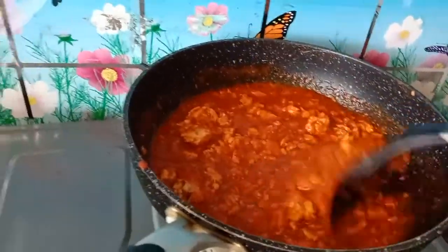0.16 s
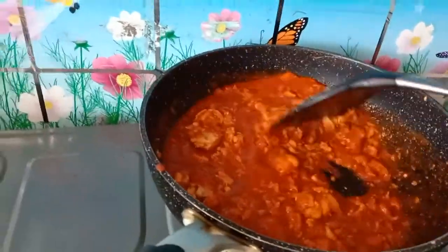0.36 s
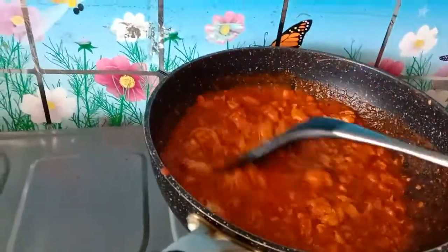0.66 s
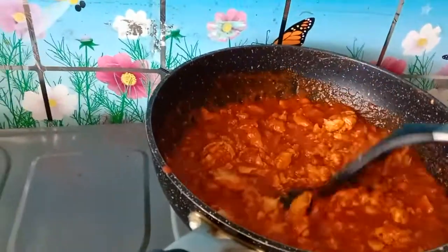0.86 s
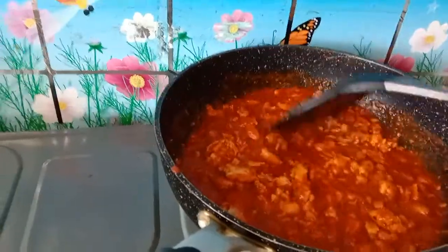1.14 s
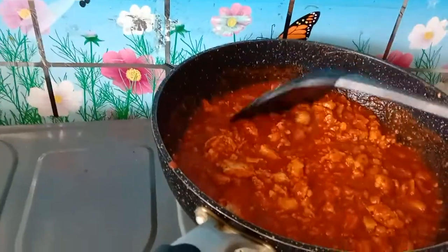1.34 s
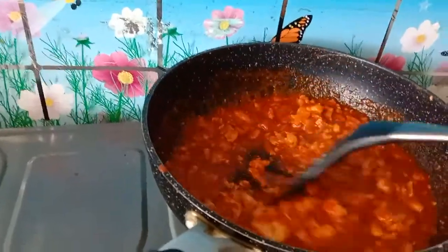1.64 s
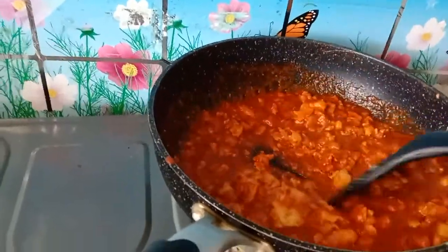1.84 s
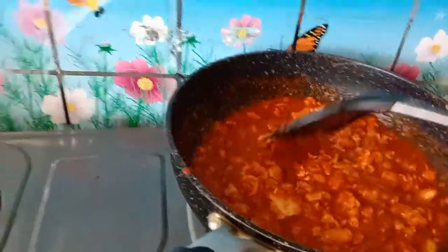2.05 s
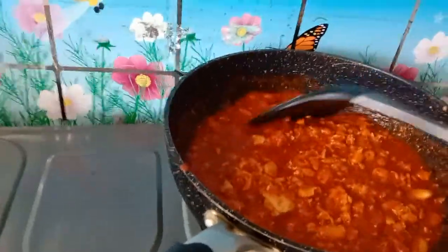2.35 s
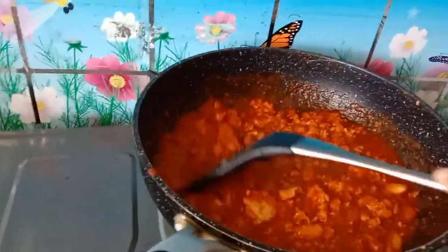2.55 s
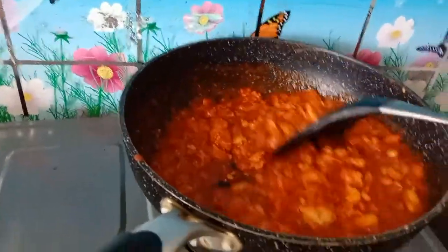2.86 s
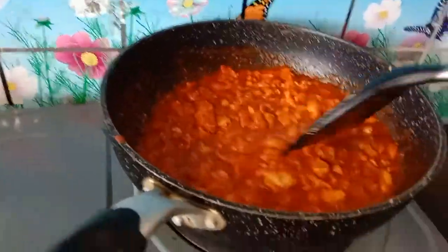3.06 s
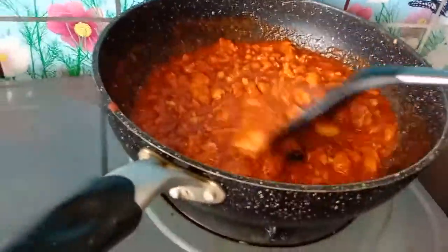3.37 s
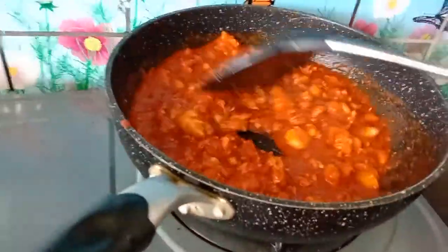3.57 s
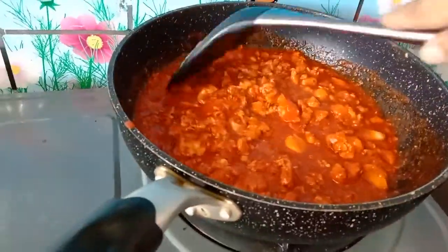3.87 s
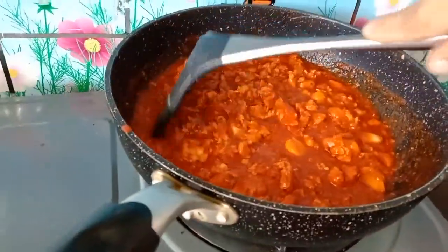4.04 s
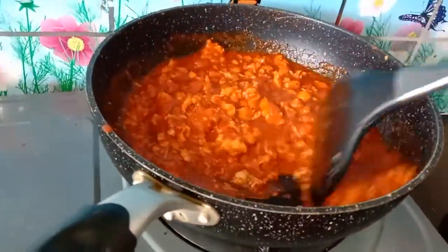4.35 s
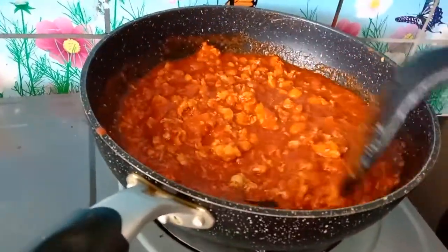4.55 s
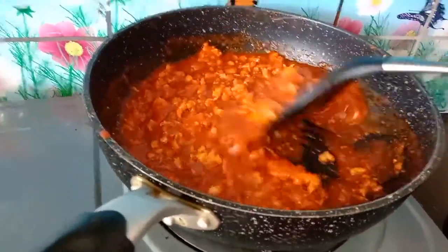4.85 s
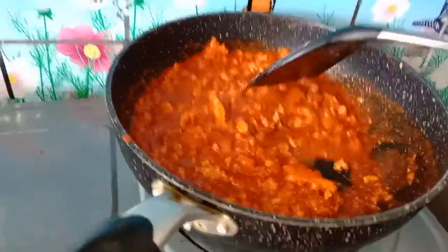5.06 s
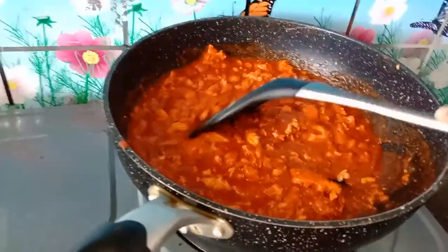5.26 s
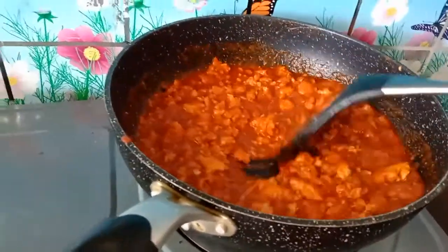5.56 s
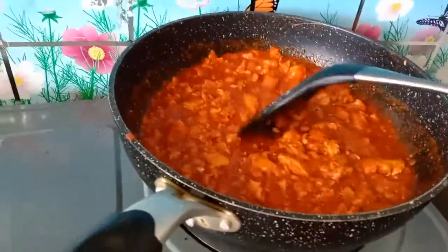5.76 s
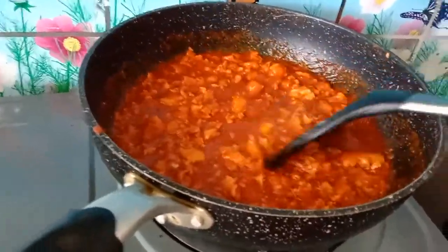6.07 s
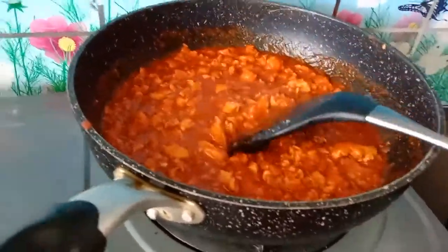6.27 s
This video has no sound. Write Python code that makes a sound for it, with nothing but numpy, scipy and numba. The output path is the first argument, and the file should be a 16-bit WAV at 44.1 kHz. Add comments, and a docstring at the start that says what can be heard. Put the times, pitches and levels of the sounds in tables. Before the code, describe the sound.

A soft spatula stirs thick, wet sauce in uneven strokes: low rubbing stutter, hollow gritty drag, squelch and light rasp. Steam crackles and fizzes in short bursts, bubbles snap, blip and gulp, and a fine hiss runs throughout. The densest spitting is early and after four seconds, with one loud pop before three. The close, slightly reverberant kitchen sound ends with a spatula knock on the pan.

```python
"""Stirring thick sauce

One microphone close above the stove in a small tiled kitchen: sauce simmers in a frying pan as a plastic
spatula stirs it. The blade's stick-slip judders, grit sounds the pan, and the parted sauce squelches.
Random steam bursts sizzle and crackle; snapping skin pops, ringing air pockets blip and gulp. The edge taps
the pan floor, and at last the spatula knocks the pan. Filtered room noise and a faint hum lie underneath.
"""
import sys
import numpy as np
from scipy import signal
from scipy.fft import rfft, irfft, next_fast_len
from scipy.io import wavfile
from scipy.ndimage import uniform_filter1d
from numba import njit

SR = 44100
rng = np.random.default_rng(int(sys.argv[2]) if len(sys.argv) > 2 else 0)


def pcm_store(signal):
    """Save signal as 16-bit PCM."""
    levels = np.round(np.clip(np.atleast_2d(signal), -1, 1) * 32767)
    wavfile.write(sys.argv[1], SR, levels.astype(np.int16).T)


N = 282681
TIME = np.arange(N) / SR

# sauce turned over by the blade:
# (time [s], length [s], relative sputter level [dB], relative wet crackle level [dB])
TURNS = [(.08, 0.19, -51, -40.5), (.265, 0.17, -47, -43), (.39, 0.11, -44, -48), (.6, .06, -49, -56),
         (.72, 0.052, -49.5, -81), (.96, 0.14, -50.5, -45), (1.08, 0.014, -30.5, -30.5),
         (1.26, 0.025, -40.5, -37.5), (1.325, 0.029, -48, -80), (1.95, 0.091, -54, -45.5),
         (2.14, 0.038, -43.5, -64), (2.24, 0.17, -63, -44), (2.645, 0.045, -41.5, -25.5),
         (2.793, 0.025, -39.5, -36.5), (2.89, 0.13, -54, -52), (3.07, 0.11, -57.5, -59),
         (3.22, 0.011, -70, -42.5), (3.73, 0.077, -44, -56), (4.23, 0.16, -53, -45),
         (4.36, 0.16, -53.5, -39), (4.58, 0.13, -64, -42), (4.835, 0.035, -38.5, -44),
         (4.88, 0.047, -43, -35), (4.95, 0.11, -45, -42), (5.165, 0.059, -47.5, -41),
         (5.29, 0.23, -59, -44), (5.475, 0.04, -42, -39.5), (5.69, 0.033, -49.5, -63),
         (5.81, 0.094, -57, -47), (6.08, 0.028, -51, -65), (6.19, 0.05, -56, -42)]


def undb(db):
    """Decibels to gain."""
    return 10 ** (np.asarray(db) / 20)


def unit(x):
    """Scale to a standard deviation of 1."""
    return x / np.std(x)


def add(out, s, x):
    """Mix x into out from time s, in seconds."""
    i = max(int(s * SR), 0)
    out[i:i + len(x)] += x[:max(len(out) - i, 0)]


def peak(x, db):
    """Set the loudest 2 ms of a sound to an rms level."""
    loudest_power = uniform_filter1d(x * x, size=88).max()
    return x * undb(db) / np.sqrt(loudest_power)


def fade(t, t60):
    """Exponential decay, 60 dB down after t60 seconds."""
    return np.exp(-np.log(1000) * t / max(t60, 1e-4))


def colour(x, points):
    """Filter by a spectrum of (frequency [Hz], level [dB]) points, joined along log frequency."""
    hz, db = np.transpose(points)
    n = next_fast_len(len(x))
    f = np.fft.rfftfreq(n, 1 / SR) + 1  # + 1 keeps the logarithm finite
    gain = undb(np.interp(np.log(f), np.log(hz), db))
    return irfft(rfft(x, n) * gain, n)[:len(x)]


def band(x, hz, width_hz):
    """One resonance, gain 1 at its centre; centre and width are capped for stability."""
    q = hz / min(abs(width_hz), SR / 4)
    return signal.lfilter(*signal.iirpeak(min(hz, SR / 3), q, fs=SR), x)


@njit
def moving_band(x, hz, damping):
    """State-variable resonance whose centre moves."""
    y, b, low = np.empty(len(x)), 0., 0.
    for i in range(len(x)):
        g = np.tan(np.pi * hz[i] / SR)
        y[i] = (b + g * (x[i] - low)) / (1 + g * (g + damping))
        b, low = 2 * y[i] - b, low + 2 * g * y[i]
    return y


def ring(x, modes):
    """A set of resonances driven together."""
    return sum(undb(db) * band(x, hz, width) for hz, width, db in modes)


def walk(rate):
    """Random wander with spread 1, in straight lines between rate knots a second."""
    knots = rng.standard_normal(int(N / SR * rate) + 2)
    return unit(np.interp(TIME * rate, np.arange(len(knots)), knots))


def tone(hz, waver, rate):
    """A note of rms 1 whose pitch wavers at random."""
    pitch = hz * (1 + waver * walk(rate))
    return unit(np.sin(2 * np.pi * np.cumsum(pitch) / SR))


def clicks(rate, spread_db):
    """Random impulses, rate a second on average, most small and a few large."""
    size = undb(spread_db * np.minimum(rng.exponential(size=N), 4))
    happens = rng.random(N) < rate / SR
    return happens * size * np.sign(rng.standard_normal(N))


def bubble(hz, t60, glide, swell):
    """A pocket of air rings; its pitch rises as it opens to the surface."""
    t = np.arange(int(SR * abs(t60)) + 64) / SR
    pitch = hz * (1 + glide * (t / t[-1] - 1 / 4))
    opening = (1 - np.exp(-t / (swell * t[-1]))) ** 2
    return np.sin(2 * np.pi * np.cumsum(pitch) / SR) * fade(t, t60) * opening


def froth(count, low_hz, high_hz, cycles, spread_db):
    """Many small air pockets open at random, each ringing until it has died away."""
    out = np.zeros(N)
    for when, pitch, size, damping in rng.random((count, 4)):
        hz = low_hz * (high_hz / low_hz) ** pitch
        gain = undb(-spread_db * np.log(max(size, .05)))
        t60 = cycles * (.5 + damping) / hz
        add(out, when * N / SR, gain * bubble(hz, t60, glide=0.076, swell=0.032))
    return unit(out)


def spits(count, low_hz, high_hz, t60, spread_db):
    """Small craters spit at random, each a brief puff with a pitch of its own."""
    out, t = np.zeros(N), np.arange(SR // 25) / SR
    for when, pitch, size, length in rng.random((count, 4)):
        hz = low_hz * (high_hz / low_hz) ** pitch
        gain = undb(-spread_db * np.log(max(size, .08)))
        puff = rng.standard_normal(len(t)) * fade(t, t60 * (.5 + length))
        puff = band(band(puff, hz, hz / 12), hz, hz / 12)
        add(out, when * N / SR, gain * puff)
    return unit(out)


def strokes(rows, attack_s, release_s, rest_db, wander_db, lumps_db, axis=2):
    """Gain of a layer: strokes rise, catch on lumps and die away; light stirring wanders in between."""
    gain = np.zeros(N)
    for row, rise_s in zip(rows, np.broadcast_to(attack_s, len(rows))):
        s, length_s, db = row[0], row[1], row[axis]
        t = np.arange(int(SR * (abs(length_s) + abs(release_s)))) / SR
        rise = np.clip(t / rise_s, 0, 1)
        add(gain, s, undb(db) * rise * fade(np.maximum(t - length_s, 0), release_s))
    lumps = undb(lumps_db * np.clip(walk(45), -1.5, 1.5))
    light_stirring = undb(rest_db + wander_db * np.tanh(walk(8.7)))
    return np.hypot(gain * lumps, light_stirring)


def stroke_pitch(rows, octaves_per_s):
    """Each stroke glides up through its own pitch at a common rate."""
    times, pitches = [], []
    for s, length_s, _, hz in rows:
        times += [s, s + length_s]
        pitches += [hz * 2 ** (side * octaves_per_s * length_s / 2) for side in (-1, 1)]
    return np.interp(TIME, np.maximum.accumulate(times), pitches)


def in_pan(x, early_db=1, late_db=-4, early_t60=0.11, late_t60=0.16):
    """A sound leaves one spot of the pan: resonances, quick echoes off rim and tiles, the kitchen's tail."""
    # upper resonances of the pan: (frequency [Hz], width [Hz], nominal level [dB])
    pan_modes = [(1400, 180, -16), (1620, 170, -2), (1970, 71, -2.5), (2296, 28, 0.5), (2637, 49, 2),
                 (3324, 116, -0.5), (3335, 46, -40), (3765, 28, 5), (4930, 85, 2), (5360, 205, 3),
                 (6490, 175, -3), (7000, 40, -11)]
    t = np.arange(SR // 3) / SR
    echo = np.zeros(len(t))
    for db, t60 in (early_db, early_t60), (late_db, late_t60):
        tail = rng.standard_normal(len(t)) * fade(t, t60) * (t > .001)
        echo += undb(db) * tail / np.linalg.norm(tail)
    echo[0] = 1  # the direct sound
    # every spot shifts the resonances a little in pitch and level
    shifts = rng.standard_normal((len(pan_modes), 2))
    spot = [(hz * (1 + .015 * shift), width, db + 2 * gain)
            for (hz, width, db), (shift, gain) in zip(pan_modes, shifts)]
    return signal.fftconvolve(x + ring(x, spot), echo / np.linalg.norm(echo))[:len(x)]


def around_pan(x, early_db, late_db, count=3):
    """A lasting sound shifts between several spots in the pan, so its colour keeps changing."""
    shares = np.array([walk(14) for _ in range(count)])
    shares /= np.linalg.norm(shares, axis=0)
    return sum(in_pan(x * share, early_db, late_db) for share in shares)


def spatula():
    """The soft blade sticks and slips in a low judder; its drag sounds the pan's hollow and gurgles."""
    # blade pressed on the pan: (time [s], length [s], relative level [dB], judder pitch [Hz])
    rubs = [(0.0, 0.068, -45.5, 103.7), (.1, 0.062, -37.5, 106.2), (.2, 0.065, -39, 104.8),
            (.32, 0.013, -48, 107), (.42, 0.033, -44, 101), (.55, 0.027, -50, 99.2),
            (.66, 0.12, -60, 102.4), (2.0, 0.079, -51, 110), (2.06, 0.035, -42, 103.6),
            (2.115, 0.063, -47, 108), (2.17, 0.18, -51.5, 101.1), (2.37, 0.036, -44, 102.4),
            (2.42, 0.067, -38.5, 103.8), (2.54, 0.17, -42.5, 101.3), (2.72, 0.06, -40, 101.2),
            (2.87, 0.19, -49.5, 104.6), (2.97, 0.15, -47, 105.4), (3.2, 0.026, -41.5, 106.2),
            (3.3, 0.31, -48.5, 109.5), (3.69, 0.11, -58.5, 111), (3.89, .14, -46, 110.7),
            (4.485, 0.23, -48, 122.5), (4.7, 0.059, -48, 127.3), (5.42, 0.13, -58, 135.4),
            (5.9, 0.093, -54, 140), (5.97, 0.21, -46.5, 139), (6.165, .17, -44, 137.3),
            (6.34, 0.02, -33, 132)]
    # blade dragged through the sauce: (time [s], length [s], relative level [dB])
    drags = [(.08, 0.15, -55.5), (.29, 0.038, -47), (.41, 0.076, -40), (.55, 0.072, -51.5),
             (.64, 0.05, -47), (.88, 0.028, -50.5), (.97, 0.022, -55), (1.07, 0.25, -56),
             (1.82, 0.11, -51.5), (2.05, 0.076, -46.5), (2.21, .14, -47.5), (2.48, 0.093, -53),
             (3.04, 0.094, -47.5), (3.19, 0.18, -50.5), (3.46, 0.26, -52.5), (3.765, 0.075, -41.5),
             (3.86, 0.049, -59), (3.985, 0.034, -49), (4.475, 0.031, -43.5), (4.59, 0.146, -46),
             (4.86, 0.24, -52.5), (5.26, 0.077, -56.5), (5.47, 0.068, -53), (5.6, .06, -60),
             (5.79, 0.099, -56), (5.87, 0.044, -44), (6.145, 0.039, -40), (6.22, 0.044, -44.5),
             (6.34, 0.03, -49.5)]
    # resonances of the pan's hollow: (frequency [Hz], width [Hz], relative level [dB])
    hollow_modes = [(579, 16, 7.5), (590, 18, -14), (657, 48, -4.5)]
    # spectrum of the gritty drag: (frequency [Hz], relative level [dB])
    drag_colour = [(100, 10), (250, -2), (450, 18), (750, 19), (1200, -9), (2500, -70)]
    hollow_hz = 580
    stove_hz, stove_db, stove_db_per_hz = 174.8, 8, 0.67  # the stove top's note

    pitch = stroke_pitch(rubs, octaves_per_s=0.12)
    slips = tone(pitch, waver=.035, rate=70) * undb(1.2 * walk(45))
    rough = moving_band(rng.standard_normal(N), 1.05 * pitch, 0.7)
    slips += undb(-8) * unit(moving_band(rough, 1.05 * pitch, 0.7))
    # uneven slips thump nearly an octave higher
    thump = moving_band(rng.standard_normal(N), 1.9 * pitch, 0.39)
    slips += undb(-22.5) * unit(moving_band(thump, 1.9 * pitch, 0.39))
    # the stove top's share falls as the judder's pitch moves away from its note
    stove_share = undb(stove_db - stove_db_per_hz * np.abs(stove_hz - pitch))
    stove = tone(stove_hz, waver=0.0289, rate=55) * stove_share
    pressure = strokes(rubs, attack_s=.025, release_s=.14, rest_db=-76, wander_db=4, lumps_db=1.3)
    judder = unit(slips + stove) * pressure

    grit = clicks(rate=2800, spread_db=2.0)
    gritty_hollow = unit(band(ring(grit, hollow_modes), 619, 140))
    hollow_note = tone(hollow_hz, waver=.035, rate=70) * undb(2.5 * walk(35))
    hollow = unit(gritty_hollow + hollow_note)
    hollow += undb(-10.5) * unit(colour(grit, drag_colour))
    gurgle = froth(count=380, low_hz=400, high_hz=850, cycles=35, spread_db=1.8)
    dragging = strokes(drags, attack_s=0.014, release_s=0.15, rest_db=-65.0, wander_db=3.5, lumps_db=0.5)
    return judder + (undb(-2.0) * hollow + undb(-15.5) * gurgle) * dragging


def squelch():
    """Wet grit and froth sound the gap behind the blade; its pitch rises as it opens."""
    # blade parting the sauce: (time [s], length [s], relative level [dB], pitch of the gap [Hz])
    partings = [(.06, 0.049, -49, 1530), (.22, 0.16, -49, 1520), (.37, 0.26, -55, 1220),
                (.58, 0.04, -57, 2100), (1.07, 0.024, -43, 1670), (1.19, 0.067, -45, 1270),
                (1.36, 0.021, -57, 1530), (1.63, 0.038, -55, 1160), (1.7, 0.049, -49, 1910),
                (1.94, 0.038, -42, 1270), (1.985, 0.11, -47.5, 1570), (2.33, 0.31, -61, 1730),
                (3.08, .08, -59, 1664), (3.72, 0.069, -51, 1430), (4.23, 0.17, -52, 1490),
                (4.49, 0.25, -58, 1454), (4.865, 0.065, -40, 1380), (5.0, 0.044, -52, 1360),
                (5.47, 0.062, -50.5, 1338), (5.85, 0.045, -42, 1800), (6.01, 0.06, -52, 1440),
                (6.16, 0.084, -47.5, 920)]
    wet = unit(clicks(rate=900, spread_db=3.5))
    gap_hz = stroke_pitch(partings, octaves_per_s=1.1) * undb(.5 * walk(30))
    gap = unit(moving_band(wet, gap_hz, 0.14))
    gap = unit(colour(gap, [(400, -16), (800, -11.0), (1200, 10.5), (2000, 9.0), (4000, -17), (10000, -18)]))
    pockets = froth(count=1000, low_hz=821, high_hz=2100, cycles=75, spread_db=2.4)
    parting = strokes(partings, attack_s=0.0086, release_s=0.029, rest_db=-71.5, wander_db=11.5, lumps_db=1.5)
    wet_gap = undb(-10.5) * gap + undb(-11.5) * pockets
    return around_pan(wet_gap * parting, early_db=3.5, late_db=-2.5)


def scraping(catches_per_s=100):
    """The edge catches and lets go at uneven intervals; each slip is a short rasp of grit in the pan wall."""
    # blade edge on the coated pan floor: (time [s], length [s], level [dB])
    scrapes = [(.09, 0.18, -57), (.25, 0.16, -45), (.39, 0.066, -51), (.6, 0.11, -54.5), (.72, 0.058, -78),
               (.96, 0.13, -58), (1.07, 0.076, -51), (1.27, 0.13, -58.5), (1.95, 0.07, -58),
               (2.15, 0.02, -51), (2.24, 0.22, -61.5), (2.79, 0.13, -60), (3.74, 0.094, -75),
               (4.235, 0.034, -47), (4.29, 0.12, -52), (4.875, 0.069, -45), (4.98, 0.082, -56),
               (5.48, 0.096, -60), (5.68, 0.21, -62.5), (6.2, 0.053, -66)]
    t = np.arange(SR // 20) / SR
    catches = np.abs(clicks(rate=catches_per_s, spread_db=0.5))
    slips = signal.fftconvolve(catches, fade(t, 0.033))[:N]
    grit = clicks(rate=4000, spread_db=1.5) * (.5 + slips)
    rasp = colour(around_pan(grit, early_db=-1.5, late_db=-8.5),
                  [(500, -7), (1000, -21.0), (1600, 4.0), (2300, -12.5), (3400, 4),
                   (4500, 2.0), (6000, 2.0), (9000, -0.5), (16000, -9)])
    contact = strokes(scrapes, attack_s=0.028, release_s=0.051, rest_db=-75.5, wander_db=2.5, lumps_db=1.0)
    return unit(rasp) * contact


def frying():
    """Steam bursts in gritty spurts: sputter and crackle where sauce is turned, sizzle on bare metal."""
    # sauce running onto bared hot metal: (time [s], length [s], relative level [dB], rise [s])
    sizzles = [(0.08, 0.013, -49.5, 0.0042), (0.165, 0.05, -58, .006), (0.21, 0.072, -39.5, 0.057),
               (0.273, 0.12, -49.5, 0.017), (0.588, 0.029, -42, 0.0048), (0.704, 0.042, -51, 0.032),
               (0.905, 0.21, -46, 0.14), (1.268, 0.043, -55, 0.0044), (1.955, 0.079, -62, 0.022),
               (2.13, 0.012, -64, .004), (2.238, 0.028, -48.5, 0.013), (2.647, 0.029, -40.5, 0.0056),
               (2.751, 0.094, -51.5, 0.017), (2.965, 0.22, -59, 0.017), (3.459, 0.045, -51.5, 0.013),
               (3.597, 0.0096, -53, 0.0062), (4.247, 0.046, -53.5, .014), (4.37, 0.12, -48.5, .006),
               (4.583, 0.025, -42, .01), (4.837, 0.12, -43, 0.062), (5.003, 0.014, -39, 0.0053),
               (5.43, 0.027, -43.5, 0.006), (5.714, 0.097, -52, 0.084), (5.985, 0.083, -48, .006),
               (6.246, 0.067, -54.5, 0.012)]
    # spectra of the three sounds: (frequency [Hz], relative level [dB])
    sputter_colour = [(1400, 6), (2200, -42), (3200, 5), (4000, 1), (4800, -47), (6500, -0.5)]
    crackle_colour = [(2500, -32), (4000, -14), (5200, 11), (6800, 4), (8500, -45), (11000, -23),
                      (16000, -52)]
    sizzle_colour = [(1000, -1.5), (2500, -21), (5000, -2), (8000, 8), (11000, 0.5), (16000, 6)]

    coarse = unit(clicks(rate=550, spread_db=3.8))
    sharp = unit(clicks(rate=650, spread_db=4.8))
    spitting = spits(count=800, low_hz=4600, high_hz=8000, t60=.03, spread_db=3.4)
    spray = spits(count=600, low_hz=7000, high_hz=14500, t60=.014, spread_db=4.6)
    sputter = undb(-3) * unit(colour(coarse, sputter_colour))
    sputter += froth(count=1300, low_hz=2224, high_hz=4400, cycles=90, spread_db=2.2)
    crackle = undb(-1.5) * unit(colour(coarse, crackle_colour)) + undb(-1.0) * spitting
    sputter *= strokes(TURNS, attack_s=0.016, release_s=0.19, rest_db=-63.0, wander_db=5.5, lumps_db=0.0)
    crackle *= strokes(TURNS, attack_s=0.0027, release_s=0.17, rest_db=-63.5, wander_db=5.0, lumps_db=0.5,
                       axis=3)

    spurts = undb(4 * np.tanh(walk(140)))
    sizzle = around_pan(sharp + .5 * spray, early_db=3.0, late_db=-3)
    sizzle = unit(colour(sizzle, sizzle_colour) * spurts)
    rises_s = [rise_s for *_, rise_s in sizzles]
    sizzle *= strokes(sizzles, attack_s=rises_s, release_s=0.23, rest_db=-72.5, wander_db=3, lumps_db=0.0)
    turned = around_pan(undb(-14.0) * (sputter + crackle), early_db=4.5, late_db=-8.5)
    return turned + undb(-1.0) * sizzle


def pops():
    """A skin of sauce snaps: a tick and a short spatter ring the little crater and throw fine spray."""
    # bursting sauce: (time [s], relative peak level [dB], centre [Hz], relative width [Hz],
    # relative spatter time [s], relative spray level [dB])
    bursts = [(0.0588, -36, 1700, 500, 0.01, -18), (0.1777, -31, 6900, 2200, 0.013, -11),
              (.238, -35, 6600, 2000, .012, -14), (0.285, -38, 9000, 6000, .004, -7),
              (.336, -36.5, 3970, 1500, 0.015, -17), (0.411, -24.5, 6060, 2210, 0.02, -28),
              (0.448, -31, 3360, 895, 0.022, -33), (0.589, -34.5, 9200, 6050, 0.008, -1),
              (.61, -39, 8500, 6000, .005, -2), (.6104, -42, 2270, 900, 0.012, -19),
              (0.64, -33, 8660, 4000, .007, -13), (.672, -46.5, 3530, 2000, .008, -12),
              (0.905, -36, 8900, 2260, 0.014, -39), (1.062, -33.5, 8200, 3000, .008, -16),
              (1.087, -37, 4730, 3000, 0.018, -28), (1.102, -24.5, 4070, 3000, 0.0072, -28),
              (1.268, -26.5, 7180, 2600, 0.0072, -29), (1.27, -47, 2400, 1400, .02, -25),
              (1.465, -48, 2920, 2500, 0.025, 2), (1.5388, -30.5, 6280, 2100, 0.031, -10.5),
              (1.712, -41.5, 2420, 1180, 0.029, -23), (1.867, -35, 7700, 2190, 0.023, -12.5),
              (2.044, -41, 9400, 3000, 0.0044, -15), (2.058, -36, 8700, 3000, 0.0051, -15),
              (2.131, -35, 5900, 3760, 0.02, -1), (2.157, -34, 3880, 1190, 0.03, -35),
              (2.233, -39, 8600, 4000, 0.005, -20), (2.249, -37.5, 8050, 4000, 0.021, -31),
              (2.268, -33.5, 5800, 3450, 0.03, -26), (2.35, -41, 4760, 1996, 0.025, -30),
              (2.4211, -30, 8600, 3040, 0.0095, -30), (2.48, -30, 3180, 1200, 0.013, -40),
              (2.6517, -17.5, 6130, 1630, 0.0083, -16.5), (2.672, -32, 5270, 1200, 0.019, -33),
              (2.704, -39, 5605, 1500, .018, -26), (2.799, -33, 5650, 1160, .03, -28),
              (2.922, -39, 4024, 600, 0.017, -29), (2.974, -39, 1980, 2500, 0.0066, -3),
              (3.014, -39.5, 9680, 4000, 0.01, -13), (3.05, -34, 11800, 3530, 0.0066, -26),
              (3.141, -38, 9300, 4020, 0.0044, -16), (3.16, -34.5, 9600, 3220, 0.011, -29),
              (3.284, -39.5, 6040, 1437, 0.043, -30), (3.395, -37.5, 7660, 2210, 0.041, -22),
              (3.604, -45, 12400, 1504, 0.015, -12), (3.812, -37, 7500, 2950, 0.014, -24),
              (3.936, -36.5, 7400, 1785, 0.011, -30), (4.134, -39.5, 6350, 1200, 0.043, -24),
              (4.174, -41, 6580, 1200, .007, -30), (4.24, -34, 7250, 1300, 0.025, -13),
              (4.255, -37, 12400, 5000, 0.0082, -8), (4.298, -40.5, 3010, 2600, 0.0097, -18),
              (4.341, -33, 3300, 3500, 0.0074, -16), (4.366, -37.5, 2100, 1600, .014, -20),
              (4.378, -31, 5500, 1810, 0.034, -16), (4.396, -26.5, 6000, 2500, 0.012, -22),
              (4.478, -34, 4750, 2210, 0.047, -10), (4.589, -33.5, 6600, 2860, 0.034, -43),
              (4.629, -32, 6270, 1595, 0.025, -23), (4.668, -36, 8000, 2490, .007, -15),
              (4.71, -39, 6060, 1300, 0.016, -17), (4.756, -38.5, 6580, 2000, .012, -13),
              (4.83, -31.5, 8250, 3960, 0.011, -1), (4.872, -40, 1700, 1200, 0.0068, -20),
              (4.896, -35.5, 3270, 980, 0.022, -23), (4.9144, -31, 5500, 4000, .006, 3),
              (4.949, -36, 9000, 5000, 0.005, -6), (4.975, -35, 9500, 5000, 0.0045, -8),
              (4.934, -40, 3200, 907, 0.012, -28), (4.988, -32.5, 4500, 1000, 0.05, -37),
              (5.009, -28, 6650, 3820, 0.028, -22), (5.164, -32, 6400, 1580, 0.038, -43),
              (5.189, -36, 4460, 980, 0.033, -18), (5.405, -33.5, 7760, 2190, 0.017, -27),
              (5.4313, -30, 10780, 5030, 0.0046, -16), (5.483, -25, 5180, 1700, 0.027, -29),
              (6.139, -28.5, 6040, 1280, 0.039, -29), (6.218, -35, 5750, 800, 0.015, -19),
              (6.309, -39, 6000, 1308, 0.055, -21)]
    out, t = np.zeros(N), np.arange(SR // 3) / SR
    for s, db, hz, width_hz, spatter_s, spray_db in bursts:
        spatter = rng.standard_normal(len(t)) * np.sqrt(rng.exponential(size=len(t)))
        burst = spatter * fade(t, 3 * spatter_s)
        # the quicker the skin gives way, the harder its tick and the steeper the spatter builds up
        burst *= 1 - np.exp(-t / max(.08 * spatter_s, .0001))
        burst[0] = min(.06 / max(spatter_s, .001), 9)
        crater = burst
        for _ in range(4):  # the crater rings only near its own pitch
            crater = band(crater, hz, 1.9 * width_hz)
        spray = band(band(burst, 7300, 14000), 7300, 14000) + undb(-5.0) * band(burst, 1600, 2800)
        pop = in_pan(crater + undb(spray_db) * spray, early_db=-4, late_db=-8)
        add(out, s, peak(pop, db - 6))
    return out


def small_bubbles(count, db, low_hz, high_hz):
    """Faint bubbles at random moments: (time [s], relative peak level [dB], pitch [Hz], t60 [s])."""
    return [(when * N / SR, db - 6 * size, low_hz * (high_hz / low_hz) ** pitch, .07)
            for when, size, pitch in rng.random((count, 3))]


def bubbles(follow_s=0.03, follow_db=-12, count=3):
    """A bubble blips with a wet flutter and sets off a few like neighbours; the tiles carry the notes on."""
    # ringing bubbles: (time [s], relative peak level [dB], pitch [Hz], t60 [s])
    blips = [(0.059, -41, 1700, 0.081), (0.076, -41, 1193, 0.1), (.095, -50.5, 3540, 0.067),
             (.12, -49.5, 2155, 0.079), (0.309, -36.5, 1650, 0.027), (.415, -47, 813, 0.12),
             (0.462, -44, 3200, 0.068), (.497, -53, 1424, 0.13), (.6, -47.5, 2246, 0.098),
             (.635, -50, 1185, 0.1), (.729, -44.5, 2340, 0.14), (.755, -49, 2320, 0.05),
             (.885, -58, 1223, 0.12), (1.216, -48.5, 1330, 0.11), (1.236, -48, 1590, 0.039),
             (1.33, -44, 3530, 0.076), (1.362, -59, 3060, 0.074), (1.378, -51.5, 1880, 0.042),
             (1.372, -52, 1014, 0.1), (1.41, -55.5, 4160, 0.095), (1.463, -44.5, 1650, 0.076),
             (1.631, -55, 1118, 0.14), (1.662, -56.5, 2170, 0.15), (1.708, -49, 2690, 0.055),
             (1.721, -49, 1320, 0.06), (1.978, -44, 1420, 0.19), (2.001, -46.5, 1630, 0.11),
             (2.032, -48.5, 4360, 0.084), (2.04, -48.5, 831, 0.047), (2.31, -46.5, 2730, 0.053),
             (2.318, -56, 2310, .07), (2.382, -56, 2550, 0.1), (2.398, -57, 3140, 0.041),
             (2.35, -50.5, 3930, 0.106), (2.354, -47, 1920, 0.061), (2.434, -47, 1922, 0.13),
             (2.585, -44, 2710, 0.059), (2.6, -44, 2690, 0.091), (2.636, -39.5, 2353, 0.078),
             (2.797, -45, 3470, .09), (2.803, -56.5, 2304, 0.07), (2.83, -51, 3250, 0.064),
             (3.0, -53.5, 2540, 0.17), (3.02, -60, 1910, 0.098), (3.075, -50, 2340, 0.083),
             (3.083, -55, 1027, 0.075), (3.128, -52.5, 1550, 0.049), (3.406, -53, 2290, 0.092),
             (3.425, -49, 2310, 0.079), (3.479, -53.5, 797, 0.1), (3.478, -58, 3330, 0.11),
             (3.696, -54.5, 3280, 0.088), (3.725, -50, 2890, 0.066), (3.731, -50, 1313, 0.1),
             (3.77, -47.5, 3590, 0.057), (3.799, -52.5, 1008, 0.15), (3.905, -54, 820, 0.074),
             (3.935, -67, 3230, 0.049), (4.234, -43.5, 3780, 0.054), (4.294, -42.5, 1520, 0.028),
             (4.301, -46, 935, 0.055), (4.341, -41, 1410, 0.063), (4.369, -54, 2320, 0.072),
             (4.685, -49.5, 1957, 0.052), (5.306, -52.5, 2206, 0.12), (5.553, -53, 3370, .07),
             (5.705, -53, 2660, 0.13), (5.735, -54.5, 2120, 0.065), (5.809, -53.5, 2390, 0.14),
             (6.007, -43, 1536, 0.077), (6.054, -43, 1468, 0.07), (6.09, -57, 2895, 0.081),
             (6.219, -39, 2640, 0.032), (6.27, -42.5, 2420, 0.071)]
    out, t = np.zeros(N), np.arange(SR // 4) / SR
    for s, db, hz, t60 in [*blips, *small_bubbles(count=6, db=-46.5, low_hz=1108, high_hz=3410)]:
        flutter = unit(band(band(rng.standard_normal(len(t)), hz, hz / 5), hz, hz / 5))
        blip = undb(-16) * flutter * fade(t, 1.3 * t60)
        add(blip, 0, bubble(hz, t60, glide=rng.uniform(.03, .16), swell=0.035))
        for when, size in rng.random((count, 2)):
            neighbour = bubble(hz * (.82 + .42 * size), t60 / 2, glide=.12, swell=.03)
            add(blip, when * follow_s, undb(follow_db) * neighbour)
        add(out, s, peak(in_pan(blip, early_db=-2, late_db=-6), db - 1))
    return out


def gulps():
    """Big air pockets under the blade swell slowly, ring low and rise as they open."""
    # air pockets: (time [s], relative peak level [dB], pitch [Hz], t60 [s], rise [share of the pitch])
    pockets = [(.244, -40, 342, 0.064, .05), (0.456, -33, 573, 0.084, 0.046),
               (.52, -46.5, 572, .077, 0.039), (1.224, -44.5, 573, 0.072, 0.046),
               (1.894, -46.5, 622, 0.13, 0.023), (2.076, -39, 589, 0.076, 0.037),
               (2.243, -43.5, 583, 0.12, 0.068), (3.347, -43, 624, 0.072, .03),
               (3.36, -52.5, 447, 0.053, 0.16), (3.574, -37.5, 591, 0.12, .03),
               (3.652, -39.5, 580, 0.073, 0.032), (3.66, -54.5, 430, .09, .05),
               (3.803, -36.5, 575, 0.1, 0.055), (3.815, -48.5, 435, 0.073, .05),
               (4.501, -34.5, 570, 0.051, 0.056), (4.502, -48.5, 427, 0.09, 0.11),
               (4.755, -42, 586, 0.073, 0.045), (4.877, -41.5, 575, 0.087, 0.046),
               (5.899, -32.5, 579, 0.065, 0.038), (6.125, -53.5, 367, 0.1, 0.23),
               (6.168, -36, 598, 0.055, 0.047), (6.175, -45.5, 798, 0.13, .16),
               (6.218, -48, 895, 0.075, 0.16)]
    out = np.zeros(N)
    for s, db, hz, t60, glide in pockets:
        start_s = s - .004  # the slow swell starts a little ahead
        add(out, start_s, peak(bubble(hz, t60, glide, swell=.16), db - 2.5))
    return out


def taps(early_db=-6, late_db=-9):
    """A hard tick and a brief chatter ring the sauce-damped floor of the pan."""
    # blade's edge on the pan floor through the sauce: (time [s], peak level [dB], t60 of contact [s])
    contacts = [(0.2759, -29, 0.042), (2.4842, -24, 0.012)]
    # what the tap rings with: (frequency [Hz], width [Hz], relative level [dB])
    floor_modes = [(1730, 190, -5), (3080, 170, 4.5), (3580, 200, 2.5), (4900, 290, -0.5), (5380, 200, -2)]
    out, t = np.zeros(N), np.arange(SR // 3) / SR
    for s, db, contact_s in contacts:
        contact = rng.standard_normal(len(t)) * fade(t, contact_s)
        contact[0] = 7  # the hard tick
        add(out, s, peak(in_pan(ring(contact, floor_modes), early_db, late_db), db))
    return out


def knocks(contact_s=0.023, bite_s=0.002, land_s=0.004, soft_hz=2400):
    """The blade's edge ticks on the pan wall, then its softer body lands, rings the low modes and chatters."""
    # spatula knocking the pan: (time [s], peak level [dB])
    blows = [(6.337, -17.5)]
    # what the knock rings with: (frequency [Hz], relative level [dB], t60 [s])
    wall_modes = [(1180, -13, 0.23), (1420, -12, 0.083), (1540, 1, 0.051), (1642, -1.5, 0.065),
                  (1665, -13, 0.11), (2720, -27, .15), (3220, -9.5, 0.15), (4740, 2, 0.065),
                  (4980, -6, 0.29), (5240, -9, 0.1), (5780, -11, 0.09), (6290, 5.5, 0.029), (6480, -14, .2),
                  (7780, -7, 0.053), (312, -19, 0.25), (131, -43, .2)]
    out, t = np.zeros(N), np.arange(SR // 3) / SR
    for s, db in blows:
        blow = undb(-2.0) * band(rng.standard_normal(len(t)), 7200, 3700) * fade(t, contact_s)
        chatter = unit(band(band(rng.standard_normal(len(t)), 1430, 710), 1430, 710))
        blow += undb(-9) * chatter * fade(t, .16) * np.clip(t / land_s, 0, 1)
        for hz, mode_db, t60 in wall_modes:
            # the blade stays on the wall and damps the first swings
            damped = fade(t, t60) * (0.2 + fade(t, 0.043))
            mode = undb(mode_db) * np.sin(2 * np.pi * hz * t) * damped
            if hz < soft_hz:  # the softer body lands late
                mode *= np.clip(t / land_s - 1 / 2, 0, 1) * undb(10.5)
            blow += mode
        blow *= np.clip(t / bite_s, 0, 1)
        add(out, s, peak(in_pan(blow, early_db=-21.0, late_db=-6.0), db))
    return out


def seething():
    """All over the sauce small wet bubbles keep opening, and many more where the blade turns it."""
    small = froth(count=600, low_hz=800, high_hz=4800, cycles=160, spread_db=2)
    small = unit(colour(small, [(800, -4.5), (1400, 2.5), (2200, -3.5), (3300, 4), (4800, -2)]))
    stirred = froth(count=650, low_hz=1100, high_hz=4400, cycles=150, spread_db=1.6)
    stirred *= strokes(TURNS, attack_s=0.015, release_s=0.078, rest_db=-83, wander_db=-18, lumps_db=1.5)
    small *= undb(-70.0 + 1.84 * walk(5.2))
    return around_pan(small + undb(-16) * stirred, early_db=-2, late_db=-4)


def simmer():
    """Countless tiny steam bursts merge into a fine hiss whose level drifts."""
    # spectrum of the hiss: (frequency [Hz], relative level [dB])
    simmer_colour = [(1000, -40), (2700, -3), (4200, -37), (5500, -7), (6800, 14.5), (8000, 9.5),
                     (10200, 5.5), (11200, -7), (16000, -23)]
    # resonances of the pan wall: (frequency [Hz], width [Hz], relative level [dB])
    wall_modes = [(5300, 110, -12), (6640, 250, -1.5)]
    # mean course of the hiss: (time [s], level [dB])
    simmer_level = [(0, -53), (.8, -57), (1.4, -59.5), (1.75, -57.5), (2.1, -56.5), (2.9, -56), (3.3, -60),
                    (3.9, -56), (4.2, -57), (5.1, -54.5), (5.9, -59), (6.4, -55)]
    fine = unit(colour(clicks(rate=5000, spread_db=2.8), simmer_colour))
    fizz = spits(count=1100, low_hz=5200, high_hz=10000, t60=.025, spread_db=2.6)
    hiss = fine + undb(-4) * fizz
    hiss = unit(in_pan(hiss + ring(hiss, wall_modes), early_db=5.5, late_db=-5.0))
    level_db = np.interp(TIME, *np.transpose(simmer_level)) + 1.0 * walk(6.3)
    return hiss * undb(level_db)


def kitchen():
    """Low room noise with a faint hum, both wavering in level."""
    # spectrum of the room noise: (frequency [Hz], relative level [dB])
    kitchen_colour = [(20, -10), (45, -2), (80, -13.5), (112, 7), (170, 0.5), (260, -7), (450, -5),
                      (580, -12.5), (740, -11), (1400, -7), (2000, -18), (4000, -56), (16000, -41)]
    hum_hz = 100
    air = unit(colour(rng.standard_normal(N), kitchen_colour)) * undb(-63.5 + 1.0 * walk(3.5))
    hum = np.sin(2 * np.pi * hum_hz * TIME) * undb(-70.5 + 2.3 * walk(7.7))
    return air + hum


def scene():
    """Everything at one microphone above the stove."""
    stirring = spatula() + squelch() + scraping()
    bursting = frying() + pops() + bubbles() + gulps()
    striking = taps() + knocks()
    background = seething() + simmer() + kitchen()
    return (stirring + bursting + striking + background)[None]


def record(dry):
    """The phone's microphone thins the deep bass and cuts the top."""
    top_hz = 15750
    thin = signal.sosfilt(signal.butter(2, 50, "highpass", fs=SR, output="sos"), dry)
    return signal.sosfilt(signal.ellip(10, .2, 70, top_hz, fs=SR, output="sos"), thin)


dry = scene()
out = record(dry)
pcm_store(out)
```